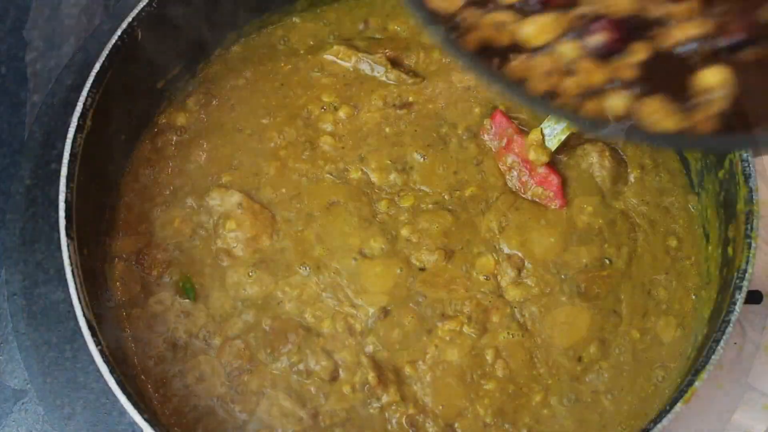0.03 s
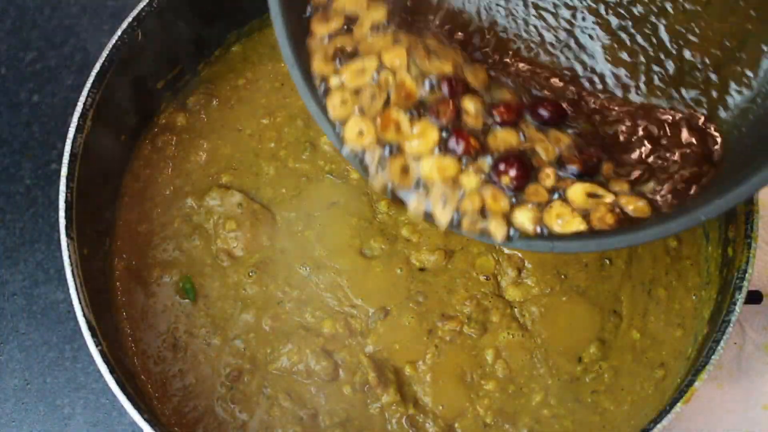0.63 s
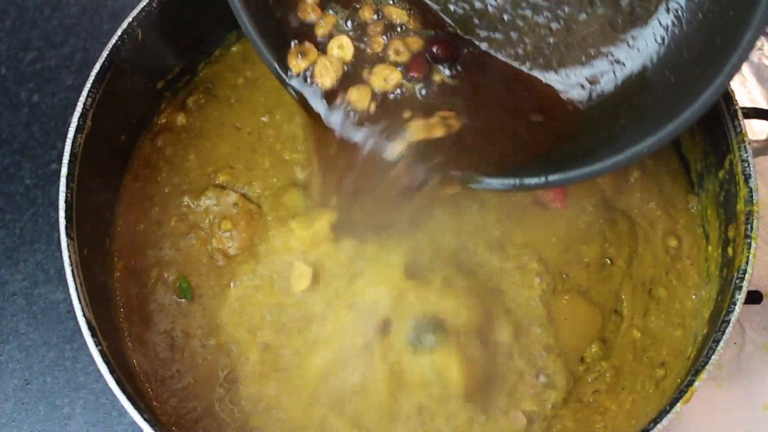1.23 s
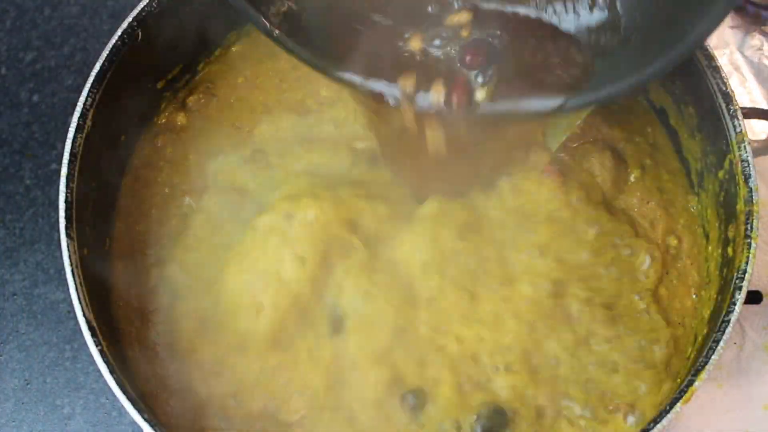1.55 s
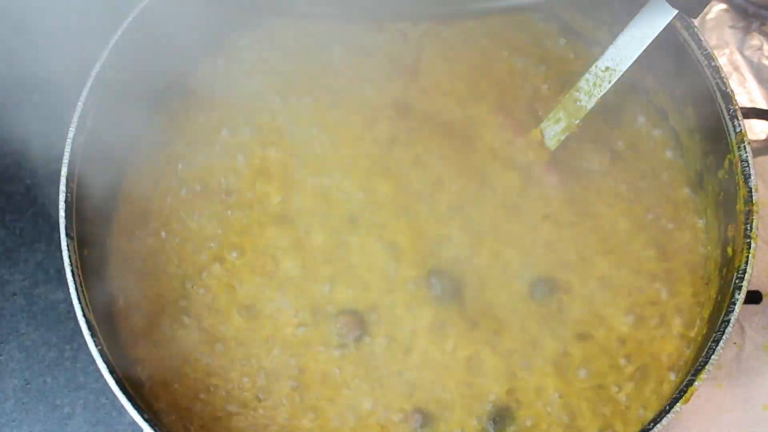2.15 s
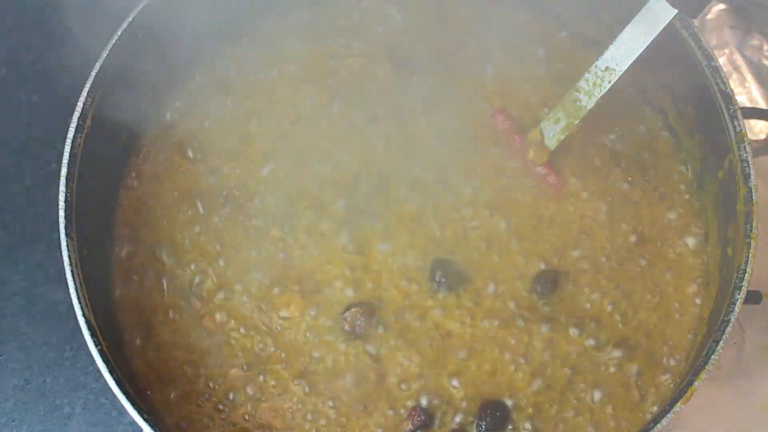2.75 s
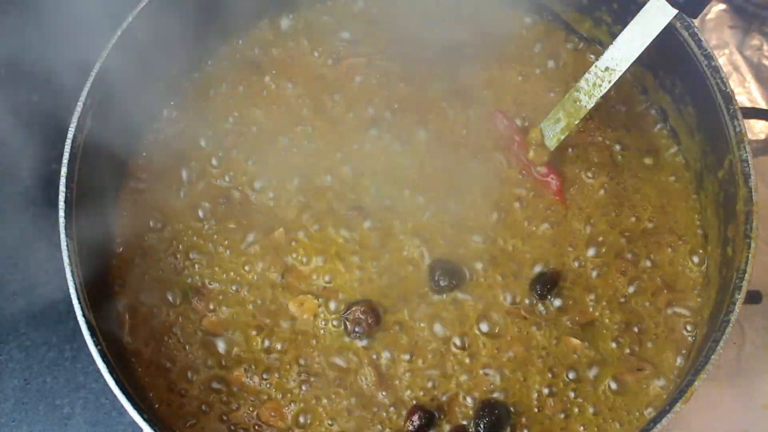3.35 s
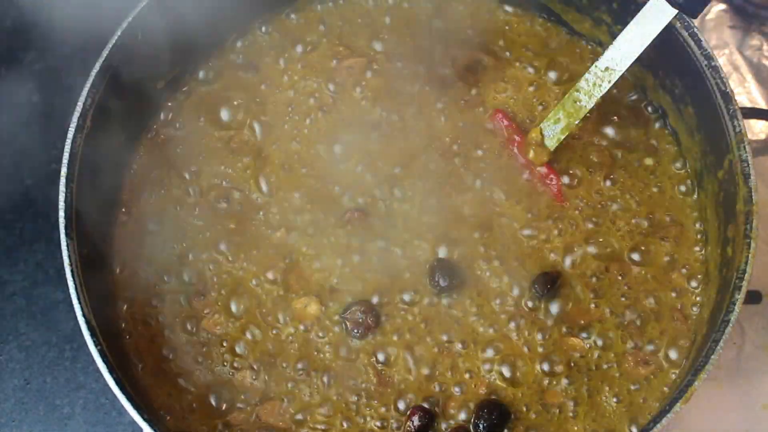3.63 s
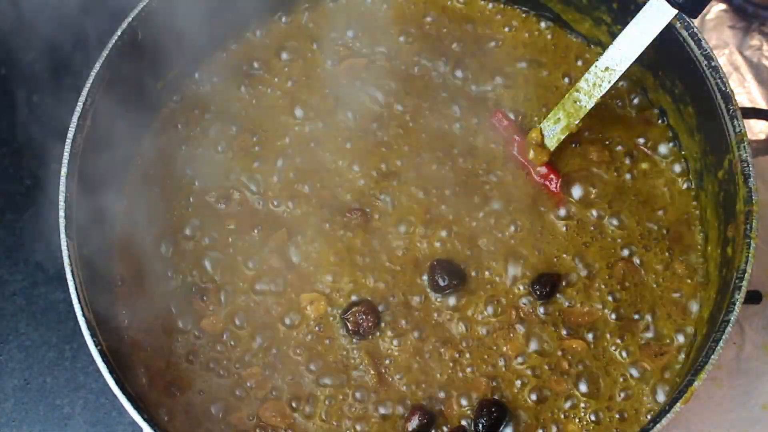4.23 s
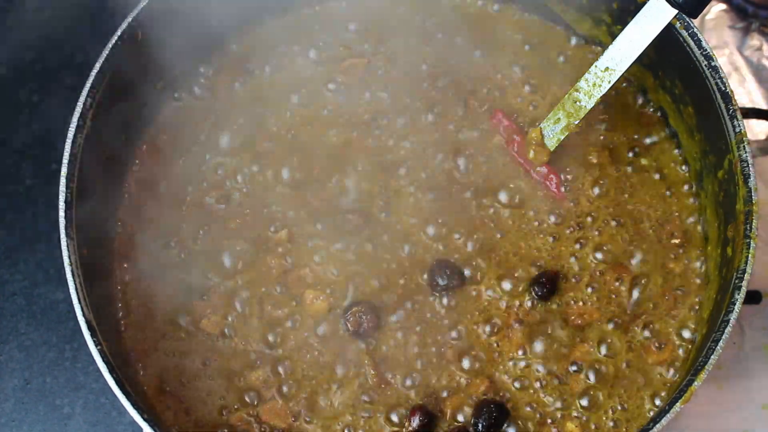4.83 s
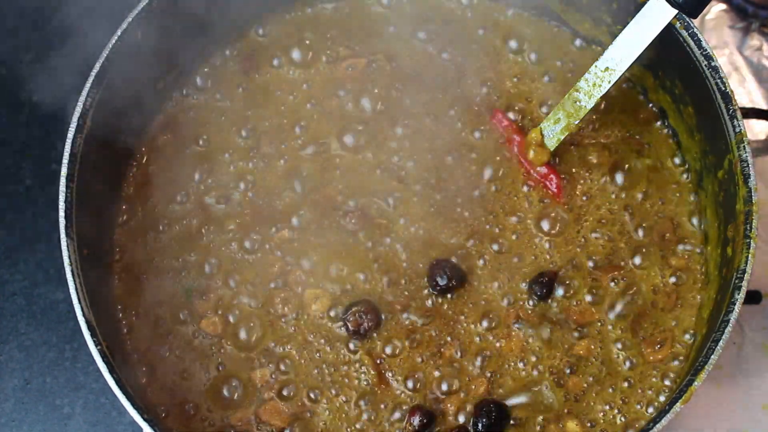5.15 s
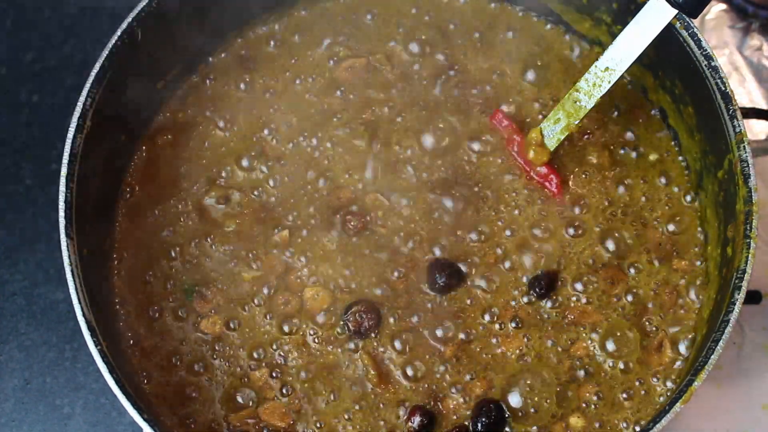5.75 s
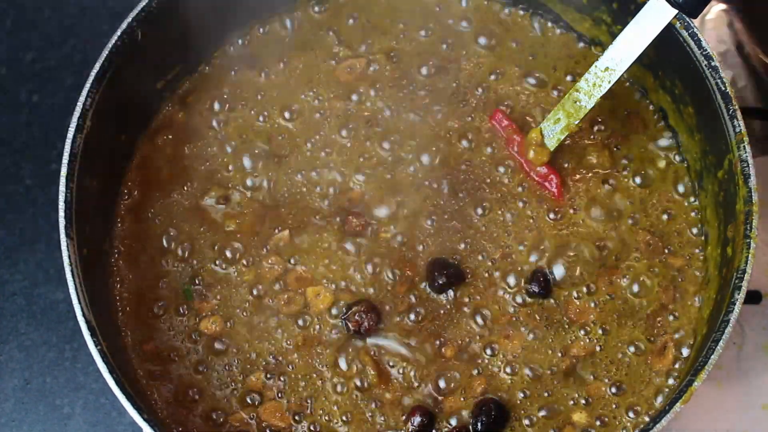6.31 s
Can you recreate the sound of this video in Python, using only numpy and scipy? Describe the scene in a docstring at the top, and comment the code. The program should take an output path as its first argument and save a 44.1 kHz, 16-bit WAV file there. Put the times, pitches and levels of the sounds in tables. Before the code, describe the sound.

Faint frying, then hot fat is poured into a pot of lentils with a loud hissing sizzle that turns to crackling and fades to a simmer.

```python
"""First comes the thin fizz of garlic and chillies frying in a small pan of hot ghee, in a kitchen.
The fat is poured into a pot of lentils: water flashes to steam with a bright hiss, garlic gulps under
and the surface churns. As the fat cools, the hiss coarsens into a crackle of bursting bubbles, which
thins out to a simmer with a few lone pops. Each bubble is a tiny ring; thousands make a sizzle."""
import sys
import numpy as np
from scipy import signal
from scipy.fft import rfft, irfft
from scipy.io import wavfile
from scipy.ndimage import uniform_filter1d

SR = 44100
rng = np.random.default_rng(int(sys.argv[2]) if len(sys.argv) > 2 else 0)


def output_pcm(signal):
    """Save a mono or channel-first signal as 16-bit PCM at the path in sys.argv[1].

    Samples are clipped to [-1, 1] before scaling.
    """
    pcm = np.clip(np.atleast_2d(signal).T, -1, 1) * 32767
    wavfile.write(sys.argv[1], SR, np.round(pcm).astype(np.int16))


N = 281392
TIME = np.arange(N) / SR
PAN_EMPTIES_S, PAN_FADE_DB_PER_S = 1.0, 67
POUR_END_S, BOIL_FULL_S, BOIL_END_S = 2.128, 2.81, 3.63   # the boil builds, holds, then sinks
POP_RISE = 0.039   # how strongly a bubble's pitch climbs as it opens

# The first drops land, then the stream: time_s, share_touching (0-1)
FAT_CONTACT = [(.862, 0.11), (.879, 0.08), (.887, 0.62), (.9, 0.66)]
# The crackle swells towards the middle of the pour, then eases: time_s, lift_db
CRACKLE_LIFT = [(.9, -2), (1.15, 0.5), (1.27, 1), (1.53, 2), (1.85, -0.3), (2.2, 0.5)]
def sizzle():
    """Hot fat meets wet lentils and boils their water; bubbles grow fewer after the pour."""
    simmer_per_s, pour_per_s, thinning_s = 1700, 32000, .55
    per_s = simmer_per_s + pour_per_s * np.exp(-np.maximum(TIME - POUR_END_S, 0) / thinning_s)
    coarse = np.interp(TIME, [2.2, 3.3], [.3, 1])   # fewer bubbles burst less evenly
    widening = from_db(np.interp(TIME, [.86, .92, 1.2], [-14, -3, 0]))   # the churning patch spreads
    touching = np.interp(TIME, *np.transpose(FAT_CONTACT), left=0)
    crackling = from_db(in_time(CRACKLE_LIFT)) * crackle(per_s, coarse) + spits() + prickle()
    surface = hiss(per_s) + crackling + widening * churn(per_s, coarse) + froth()
    return under_pan(uniform_filter1d(touching, size=96) * surface)


# The tone of the first rush of steam: pitch_hz, level_db
STEAM_TONE = [(2500, -4), (4000, -13), (6000, -1), (8000, 2.5), (10000, -4), (12500, -7.5), (15500, -15)]
# The tone of the fizz that follows: pitch_hz, level_db
FIZZ_TONE = [(3000, -36), (5500, 8), (8000, 4), (10000, -3), (12500, -6.5), (15500, -32)]
def hiss(per_s):
    """The bright flash of steam gives way to a duller fizz with tiny ringing bubbles."""
    cooled = np.interp(TIME, [2.15, 2.75], [0, 1])
    flash = bubbles(STEAM_TONE, 60000, spread_db=6, clump_db=0, clumps_per_s=50)
    fizz = bubbles(FIZZ_TONE, 2 * per_s, spread_db=.5, clump_db=4, clumps_per_s=75)
    beads = wet_ticks(260, centre_hz=7680, octaves=.25, cycles=1.5, spread_db=4.5)
    beads = rms_one(beads + kitchen(beads, echo_db=-11, tail_db=4.5))
    boiling = vigour(pour_db=-23.5, boil_db=-39.5, pour_fall=26, boil_fall=26)
    gain = np.hypot(boiling, simmer(-48, db_per_s=4.5))
    surging = from_db(surges_db() * np.interp(TIME, [3.7, 4.2], [2.2, .4]))   # most at the full boil
    cool_fizz = fizz + from_db(.5) * beads
    return gain * surging * (np.sqrt(1 - cooled) * flash + np.sqrt(cooled) * cool_fizz)


# The tone of bursting bubbles: pitch_hz, level_db
BURST_TONE = [(500, -29), (1000, -20.5), (1400, -27), (1800, -11.5), (2250, -4), (2800, -0.5), (4000, 0.5),
              (5200, 4.5), (6500, -7.5), (8500, -30), (14000, -44)]
# The lower tone of the rolling boil: pitch_hz, level_db
ROLLING_TONE = [(1100, -15.5), (1600, -4.5), (2100, 0), (2900, -12)]
def crackle(per_s, coarse):
    """Bubbles burst, with lower ones at the height of the boil and clear, ringing ones as it sinks."""
    bursts = bubbles(BURST_TONE, 1.3 * per_s, spread_db=2, clump_db=1.1 * coarse, clumps_per_s=90)
    boiling = vigour(pour_db=-25.5, boil_db=-22.5, pour_fall=53, boil_fall=24.5)
    bursts *= np.hypot(boiling, simmer(-51, db_per_s=4))
    ringing = wet_ticks(200, centre_hz=3993, octaves=.233, cycles=3.8, spread_db=2.5)
    ringing = rms_one(ringing + kitchen(ringing, echo_db=-29, tail_db=4.5))
    boiling = vigour(pour_db=-45, boil_db=-32, pour_fall=7, boil_fall=16)
    ringing *= np.hypot(boiling, simmer(-71, db_per_s=4))
    rolling = bubbles(ROLLING_TONE, 2500, spread_db=1.5, clump_db=1.3, clumps_per_s=80)
    rolling *= vigour(pour_db=-51, boil_db=-30.5, pour_fall=17.5, boil_fall=78)
    return from_db(surges_db()) * (bursts + ringing) + rolling


# The tone of the heaving surface: pitch_hz, level_db
CHURN_TONE = [(120, -42), (250, -24), (320, -32), (400, -1.5), (540, 1.5), (750, 2.5), (1000, 0.5),
              (1300, 2), (1800, 3.5), (2600, -3), (4000, -4)]
def churn(per_s, coarse):
    """The surface heaves where the fat lands and settles quickly after the boil."""
    boiling = vigour(pour_db=-30.5, boil_db=-42, pour_fall=14, boil_fall=45)
    gain = np.hypot(boiling, simmer(-66, db_per_s=4.5))
    return gain * bubbles(CHURN_TONE, .3 * per_s, spread_db=2.5, clump_db=5.2 * coarse, clumps_per_s=45)


# The foam swells and sinks: time_s, level_db
FOAM_LEVEL = [(.9, -60), (1.35, -42), (1.8, -43), (1.95, -37), (2.15, -38.5), (2.35, -56), (2.7, -41),
              (3.65, -52.5), (3.85, -80)]
# The tone of its gurgle: pitch_hz, level_db
FOAM_TONE = [(640, -14), (830, -0.5), (1020, -1), (1250, -1.5), (1450, -3.5), (1900, -9)]
def froth():
    """Large, slow bubbles gurgle in the foam that rises round the stream."""
    gurgle = bubbles(FOAM_TONE, 4000, spread_db=1, clump_db=1, clumps_per_s=40)
    return from_db(in_time(FOAM_LEVEL)) * gurgle


def spits():
    """Stray bubbles plink out of the boil and the simmer, each with a short wash of room sound."""
    gain = np.hypot(simmer(-54, db_per_s=2.5), from_db(-34.5) * fade(BOIL_END_S, 31))
    plinks = wet_ticks(45, centre_hz=4210, octaves=.296, cycles=2.1, spread_db=3)
    return gain * rms_one(plinks + kitchen(plinks, echo_db=-15, tail_db=3.5))


def prickle():
    """Tiny bubbles snap in the cooling fat: short, uneven, pitched ticks."""
    gain = np.hypot(simmer(-60.5, db_per_s=2), from_db(-30.5) * fade(BOIL_END_S, 21.4))
    cooling = np.interp(TIME, [BOIL_FULL_S, BOIL_END_S], [0, 1])
    ticks = wet_ticks(100, centre_hz=4200, octaves=.354, cycles=2.7, spread_db=4)
    return gain * cooling * signal.sosfilt(signal.butter(2, 1500, "high", fs=SR, output="sos"), ticks)


# How strongly the fat flows from the pan: time_s, flow_db
FAT_FLOW = [(.9, 2), (.97, 1.5), (1.08, -0.4), (1.3, 0.2), (1.6, 1.5), (2.0, 1.3)]
def vigour(pour_db, boil_db, pour_fall, boil_fall):
    """Bubbling follows the pour, then the boil; each dies away at its own fall, in dB a second."""
    pour = from_db(pour_db + in_time(FAT_FLOW)) * fade(POUR_END_S, pour_fall)
    boil = from_db(boil_db) * np.sqrt(np.interp(TIME, [POUR_END_S, BOIL_FULL_S], [0, 1]))
    return np.hypot(pour, boil) * fade(BOIL_END_S, boil_fall)


def simmer(level_db, db_per_s):
    """Gentle bubbling outlasts the boil and fades as the pot cools."""
    return from_db(level_db) * fade(BOIL_END_S, db_per_s)


# The boil heaves up briefly: time_s, lift_db
BOIL_SURGES = [(2.77, 0.5), (3.06, 2), (3.24, 3), (3.46, 0.5), (3.62, 1.5), (3.98, 2.5), (4.1, 0.5),
               (4.2, 1), (4.37, 0.5), (4.8, 2.5), (6.1, 1)]
def surges_db(half_width_s=.08):
    """Each surge is a smooth bump in level."""
    return sum(db * np.exp(-((TIME - s) / half_width_s) ** 2) for s, db in BOIL_SURGES)


# Single bubbles: start_s, level_db, pitch_hz, swell_cycles, left_over_right_db, room_db
LONE_POPS = [(.446, -38, 4370, 3.4, 0, -7), (.686, -40, 4380, 2.8, 0, 2), (.8635, -23, 7200, 0.97, -4, -6),
             (3.072, -9, 3620, .45, -3, -4), (3.208, -13, 2800, 0.34, 4, 7), (3.323, -7, 4180, 0.43, -5, 3),
             (3.3374, -7.5, 2840, 0.31, -5, 3.5), (3.362, -13, 3900, 0.55, 0, 3),
             (3.397, -13.5, 3570, 1.5, 3, 4), (3.439, -20, 3443, 0.66, 0, -4),
             (3.618, -6, 3890, 0.16, -4, 3), (3.706, -13.5, 4090, 0.33, 0, 11),
             (3.7424, -8, 4230, 0.32, -5, 6.5), (3.8, -14, 4430, 0.7, 0, 0),
             (3.855, -16.5, 3880, 0.69, .5, 8.5), (3.935, -20, 3450, 1.2, 0, -14),
             (3.9417, -12, 3500, 0.84, -1, 1.5), (3.971, -20.5, 2700, 1.14, -6, 2),
             (4.016, -19.5, 4200, 1.6, 0, 4), (4.0197, -25.5, 7000, 2.2, 20, 7),
             (4.056, -19, 3860, 0.98, 0, 3.5), (4.1055, -36, 10500, 1.5, 0, -2),
             (4.143, -22.5, 3820, 1.8, -8, 1), (4.157, -19, 4040, 0.99, -2, 1),
             (4.186, -23.5, 3850, 2.1, 0, 2), (4.228, -24, 4100, 2.6, -3, -2),
             (4.2489, -25, 5200, 0.65, 2, 7), (4.353, -30, 4360, 1.4, -2.5, 2),
             (4.371, -29, 3170, 1.8, -3, 2), (4.4, -30, 3940, 1.7, -1, 3), (4.4435, -34, 11400, 3.6, 16, 0),
             (4.49, -34, 3960, 2.2, -.5, -1), (4.557, -28, 4100, 1, 8, -2), (4.667, -28, 3800, 1.1, 2, 3),
             (4.7164, -10, 2560, 0.67, -5, -1.5), (4.8455, -27, 4180, 2.9, -4, -4),
             (4.8728, -34.5, 4350, 1.4, 15, 0), (4.929, -33.5, 5010, 2.8, 19, 1.5),
             (5.131, -46, 3400, 0.62, 0, -5.5), (5.1526, -39, 4050, 1.6, -4, -6),
             (5.2224, -38.5, 8420, 1.8, -3, 1), (5.2685, -42, 8360, 3.4, -2, -4),
             (5.375, -44.5, 7000, 2.8, -2, 1), (5.5038, -26.5, 4020, 4.7, 10.5, -11),
             (5.5102, -23, 8500, 2.8, 8, -8), (5.6522, -41, 5400, .7, -2, 4),
             (5.976, -35, 3770, 0.97, -5, 1), (6.2138, -31.5, 4050, 1.46, 4, -6),
             (6.248, -40, 3770, 1.5, 0, -6)]
def pops(body_ratio, body_db, body_swell_s):
    """Large bubbles ring over a faint low body; gives the direct sound and what reaches the walls."""
    direct, to_walls = 0, 0
    for s, db, hz, cycles, left_db, room_db in LONE_POPS:
        body = from_db(body_db) * pulse(s, body_ratio * hz, body_swell_s)
        ring = from_db(db) * (pulse(s, hz, cycles / hz, POP_RISE) + body)
        direct += ring * from_db(np.array([[.5], [-.5]]) * left_db)
        to_walls += ring * from_db(np.full((2, 1), room_db))
    return direct, to_walls


# Steam breaks through the lentils: start_s, level_db
STEAM_POCKETS = [(2.735, -30.5), (2.819, -26.5), (2.856, -24), (2.95, -33.5), (3.208, -29.5), (3.317, -27),
                 (3.337, -29.5), (3.437, -31), (3.617, -34), (3.752, -37), (5.976, -62)]
def spurts(plop_hz, swell_s, splash_hz, splash_db):
    """Steam pockets open with a plop and a brief, brighter splutter."""
    out = 0
    for s, db in STEAM_POCKETS:
        tuning = np.exp(rng.normal(0, .038))
        plop = pulse(s, plop_hz * tuning, swell_s)
        splutter = pulse(s + swell_s, splash_hz * tuning, swell_s=.00028)
        out += from_db(db) * (plop + from_db(splash_db) * splutter)
    return out


# Garlic slices drop into the lentils: start_s, level_db, pitch_hz
GARLIC_DROPS = [(.849, -58, 590), (1.222, -34, 685), (1.248, -30.5, 577), (1.265, -31.5, 690),
                (1.321, -40, 900)]
def gulps(swell_s, rise):
    """Each slice traps a pocket of air that rings briefly, rising in pitch."""
    return sum(from_db(db) * pulse(s, hz, swell_s, rise) for s, db, hz in GARLIC_DROPS)


# The tone of frying in the small pan: pitch_hz, level_db
FRYING_TONE = [(1100, -67), (1450, -19), (1800, -5), (2400, -1), (4200, 2.5), (7500, 4.5), (10000, 1.5),
               (12500, -10), (15500, -21)]
# The pan's hollow rings higher as it tilts: time_s, pitch_hz, gain_db
PAN_TILT = [(0, 1750, 12), (.3, 1944, 7), (.45, 2100, 6), (.57, 2300, 8), (.7, 2750, 3), (.85, 2900, 0)]
def pan_frying(level_db, nearing_db_per_s):
    """Garlic fizzes and ticks in the nearing pan until the fat runs out; the thin film has no lows."""
    fizz = bubbles(FRYING_TONE, 9000, spread_db=3, clump_db=1.5, clumps_per_s=45.4)
    ticks = wet_ticks(110, centre_hz=4920, octaves=.44, cycles=5.8, spread_db=2)
    frying = fizz + from_db(-14.5) * ticks
    s, hz, db = np.transpose(PAN_TILT)
    hollow = gliding(frying, np.interp(TIME, s, hz), width_hz=105)
    frying += (from_db(np.interp(TIME, s, db)) - 1) * hollow
    frying = signal.sosfilt(signal.butter(6, 1550, "high", fs=SR, output="sos"), frying)
    return from_db(level_db + nearing_db_per_s * TIME) * fade(PAN_EMPTIES_S, PAN_FADE_DB_PER_S) * frying


# The air between pan and pot rings: pitch_hz, width_hz, gain_db
GAP_RINGS = [(661, 220, 4.5), (870, 336, -20.5), (1065, 52, -1.5), (1587, 38, 14), (2010, 32, 4),
             (2660, 117, 3.5)]
# That gap opens as the pan tips: time_s, pitch_ratio, strength (0-1)
GAP_OPENING = [(.9, 0.97, 0.86), (1.06, 1.01, 0.7), (1.25, 1.07, 0.47), (1.6, 1.1, 0.18)]
def under_pan(x):
    """The hollow between pan and pot gives the pour a rising, throaty tone."""
    s, ratio, strength = np.transpose(GAP_OPENING)
    ratio, strength = np.interp(TIME, s, ratio), np.interp(TIME, s, strength)
    hollow = sum((from_db(db) - 1) * gliding(x, hz * ratio, width) for hz, width, db in GAP_RINGS)
    return x + strength * hollow


# The air above the lentils rings: pitch_hz, width_hz, gain_db
POT_AIR = [(298, 18, 4.5), (322, 31, -11), (406, 98, 2), (450, 40, -8), (549, 54, 5.5), (769, 48, -9.5),
           (900, 104, 6), (1097, 41, 6.5), (1265, 96, -3), (1394, 35, 4), (2050, 78, 2), (2354, 71, 2.5),
           (2640, 54, 4), (2890, 110, 2), (3500, 110, 2.5), (4060, 160, 2)]
def pot(x):
    """Sound bouncing inside the pot lifts some pitches and cancels others."""
    for hz, width, db in POT_AIR:
        x = x + (from_db(db) - 1) * ringing_at(x, hz, width)
    return x


# The pot's own notes: pitch_hz, level_db, ring_s (time to fall 60 dB)
POT_NOTES = [(2175, -21, 0.18), (2300, -1, 0.22), (2360, -2, 0.3), (2500, 3.5, 0.18)]
def pot_ring(x, gain_db):
    """A pop near the pot's own pitches leaves them ringing."""
    return sum(from_db(gain_db + db) * ringing_at(x, hz, width_hz=np.log(1000) / (np.pi * ring_s))
               for hz, db, ring_s in POT_NOTES)


# Soft low thuds and glugs: start_s, level_db, pitch_hz
LOW_THUDS = [(2.822, -56, 106.1), (2.868, -48, 115), (3.818, -62, 100.5), (4.971, -60, 165),
             (5.335, -62, 235), (5.542, -66, 345)]
def thuds(swell_s):
    """Faint, dull bumps of a few cycles each."""
    return sum(from_db(db) * pulse(s, hz, swell_s) for s, db, hz in LOW_THUDS)


# The tone of the lentils before the fat lands: pitch_hz, level_db
LENTIL_TONE = [(450, -9), (550, -2), (700, 3), (880, -3), (1000, -20)]
def stew(level_db):
    """The thick lentils plop quietly on the heat until the fat covers them."""
    plops = bubbles(LENTIL_TONE, 200, spread_db=-.5, clump_db=3, clumps_per_s=10.7)
    return from_db(level_db) * fade(PAN_EMPTIES_S, PAN_FADE_DB_PER_S) * plops


# Echoes from the pot wall, hob and tiles: delay_s, level_db
NEAR_ECHOES = [(.0019, 7.5), (.0060, 0.5), (.0068, 0), (.0088, -12), (.0096, -9), (0.013, -26.5),
               (0.0228, -27)]
def kitchen(x, echo_db, tail_db, ring_s=.18, room_db=-2):
    """Near echoes reach each ear at its own moment, and a short tail dies away."""
    age = TIME[:SR // 2]
    tail = noise([(100, -1.5), (4000, 4), (15000, -.5)], size=len(age))
    tail *= from_db(-60 * age / ring_s) * (age > .003)
    response = from_db(room_db + tail_db) * rms_one(tail) / np.sqrt(len(age))
    for delay, db in NEAR_ECHOES:
        arrivals = np.abs((delay + rng.normal(0, 5e-5, 2)) * SR).astype(int)
        response[[0, 1], arrivals] += from_db(db + echo_db)
    return signal.fftconvolve(x, response, axes=1)[:, :N]


# A faint, low hum: start_s, length_s, pitch_hz, level_db
LOW_HUM = [(5.58, 0.23, 337, -78)]
def faint_hum():
    """A soft, nearly pure tone swells and fades under the simmer."""
    out = 0
    for s, length, hz, db in LOW_HUM:
        swell = np.sin(np.pi * np.clip((TIME - s) / length, 0, 1))
        out += from_db(db) * swell * np.sin(2 * np.pi * hz * TIME)
    return out


# The tone of the quiet kitchen: pitch_hz, level_db
HUSH_TONE = [(40, -24), (90, -10.5), (200, -1.5), (320, -5), (450, -7), (700, -11), (1100, -9), (2000, 1),
             (5000, -7.5), (15000, -7)]
def kitchen_hush(level_db):
    """A faint, steady noise lies behind everything."""
    return from_db(level_db) * noise(HUSH_TONE, size=N)


def bubbles(tone, per_s, spread_db, clump_db, clumps_per_s, tail_s=.013, tail_db=3):
    """Bursts of uneven size come in clumps; each rings a few cycles in one band of pitch."""
    out, voices = 0, list(bands(tone))
    chance = np.clip(per_s / len(voices) / SR, 1e-6, 1) * np.ones(N)
    clumps = from_db(clump_db * drift(clumps_per_s))
    keep = np.exp(-1 / (tail_s * SR))
    scatter = rng.standard_normal((3, 2, N))   # neighbouring bands get unrelated noise
    for k, (hz, gain, band_pass) in enumerate(voices):
        luck, size = rng.random((2, N))
        at = np.flatnonzero(luck < chance)
        size_db = spread_db * np.minimum(-np.log(size[at]), 4.5)
        flurry_db = .83 * drift(clumps_per_s)[at]   # each band also has flurries of its own
        clicks = np.full(N, 1e-18)
        clicks[at] = from_db(size_db + flurry_db) * clumps[at] / np.sqrt(chance[at])
        # each burst has its own place, so its echoes are a fresh smear of noise
        smear = from_db(tail_db) * np.sqrt(signal.lfilter([1 - keep], [1, -keep], clicks ** 2))
        mid, side = scatter[k % len(scatter)]
        heard = two_ears(clicks * np.sign(mid) + smear * mid, (clicks + smear) * side, hz)
        out += gain * rms_one(signal.sosfilt(band_pass, heard))
    return rms_one(out)


def wet_ticks(per_s, centre_hz, octaves, cycles, spread_db):
    """Small bubbles chirp clearly, each at its own pitch and place."""
    out, age = np.zeros((2, N + 400)), TIME[:400]
    ears = np.array([[1], [-1]])
    for when, pitch, size, side, lag in rng.standard_normal((int(per_s * N / SR), 5)):
        hz = np.clip(centre_hz * 2 ** (octaves * pitch), 1500, 12000)
        at, swell = int(when * N) % N, age * hz / cycles
        rising_hz = hz * (1 + POP_RISE * np.tanh(swell / 2))
        ear_age = age + 1.8e-5 * lag * ears   # one ear hears it slightly ahead
        chirp = swell * np.exp(-swell) * np.sin(2 * np.pi * rising_hz * ear_age)
        out[:, at:at + len(age)] += from_db(spread_db * min(size, 2) + 2 * side * ears) * chirp
    return rms_one(out[:, :N])


def pulse(start_s, hz, swell_s, rise=0):
    """One note swells and dies away; `rise` bends its pitch upward."""
    swell = TIME[:SR // 8] / swell_s
    pitch = hz * (1 + rise * np.tanh(swell - 1.5))
    note = swell * np.exp(1 - swell) * np.sin(2 * np.pi * np.cumsum(pitch) / SR)
    near_pitch = signal.butter(2, [.5 * hz, min(1.4 * hz, SR / 2 - 1)], "band", fs=SR, output="sos")
    return np.pad(signal.sosfilt(near_pitch, note), (int(start_s * SR), N))[:N]


def ringing_at(x, hz, width_hz):
    """The part of a sound that rings at one pitch."""
    return signal.lfilter(*signal.iirpeak(hz, hz / width_hz, fs=SR), x)


def gliding(x, hz, width_hz):
    """The part of a sound that rings at a moving pitch."""
    turn = np.exp(2j * np.pi * np.cumsum(hz) / SR)
    keep = np.exp(-np.pi * width_hz / SR)
    return 2 * np.real(turn * signal.lfilter([1 - keep], [1, -keep], x * turn.conj() + 1e-18))


def bands(tone):
    """Split a tone into bands a third of an octave wide: centre_hz, gain, filter."""
    edges = 40 * 2 ** (np.arange(27) / 3)
    for low, high in zip(edges, edges[1:]):
        if high > tone[0][0] and low < tone[-1][0]:
            hz = np.sqrt(low * high)
            gain = from_db(at_hz(tone, hz)) * np.sqrt(high - low)
            yield hz, gain, signal.butter(2, [low, high], "band", fs=SR, output="sos")


# How alike left and right sound: pitch_hz, likeness (0-1)
EAR_LIKENESS = [(100, 0.82), (400, 0.95), (800, 0.95), (1400, 0.89), (3000, 0.7), (5500, 0.46),
                (11000, 0.18)]
def two_ears(mid, side, hz):
    """Left and right share the bass and differ in the treble."""
    alike = at_hz(EAR_LIKENESS, hz)
    return np.sqrt(1 + alike) * mid + np.sqrt(1 - alike) * side * np.array([[1], [-1]])


def noise(tone, size):
    """Smooth stereo noise with a given tone."""
    hz = np.maximum(np.fft.rfftfreq(size, 1 / SR), 1)
    mid, side = rfft(rng.standard_normal((2, size)))
    return rms_one(irfft(two_ears(mid, side, hz) * from_db(at_hz(tone, hz)), size))


def drift(per_s):
    """A random wander that changes about `per_s` times a second."""
    knots = rng.standard_normal(4096)
    return rms_one(np.interp(TIME * per_s, np.arange(len(knots)), knots))


def fade(start_s, db_per_s):
    """Full level until `start_s`, then a steady fall."""
    return from_db(-db_per_s * np.maximum(TIME - start_s, 0))


def at_hz(rows, hz):
    """Read a table at any pitch, with octaves evenly spaced."""
    pitches, values = np.transpose(rows)
    return np.interp(np.log(hz), np.log(pitches), values)


def in_time(rows):
    """Read a table at every sample."""
    return np.interp(TIME, *np.transpose(rows))


def from_db(db):
    """Turn decibels into a gain."""
    return 10 ** (np.asarray(db) / 20)


def rms_one(x):
    """Scale a sound to an average (rms) level of 1."""
    return x / np.sqrt(np.mean(x ** 2) + 1e-20)


def scene():
    """The pot shapes the sizzle; lone pops, plops and bumps also echo round the kitchen."""
    plops = spurts(plop_hz=676, swell_s=.00069, splash_hz=1470, splash_db=8)
    frying = pan_frying(level_db=-49, nearing_db_per_s=1)
    cooking = pot(frying + sizzle() + plops) + stew(level_db=-82.5)
    direct, to_walls = pops(body_ratio=.343, body_db=-31.5, body_swell_s=.0009)
    popping = direct + pot_ring(to_walls, gain_db=8)
    garlic = gulps(swell_s=.0046, rise=.053)
    bumps = thuds(swell_s=.003)
    room = kitchen(to_walls + plops + bumps, echo_db=-12.5, tail_db=1)
    return cooking + popping + garlic + .5 * bumps + room + faint_hum() + kitchen_hush(level_db=-68.5)


def record(dry):
    """The very highest treble is cut off steeply."""
    cutoff_hz = 15900
    return signal.sosfilt(signal.ellip(12, .1, 80, cutoff_hz, fs=SR, output="sos"), dry)


dry = scene()
out = record(dry)
output_pcm(out)
```